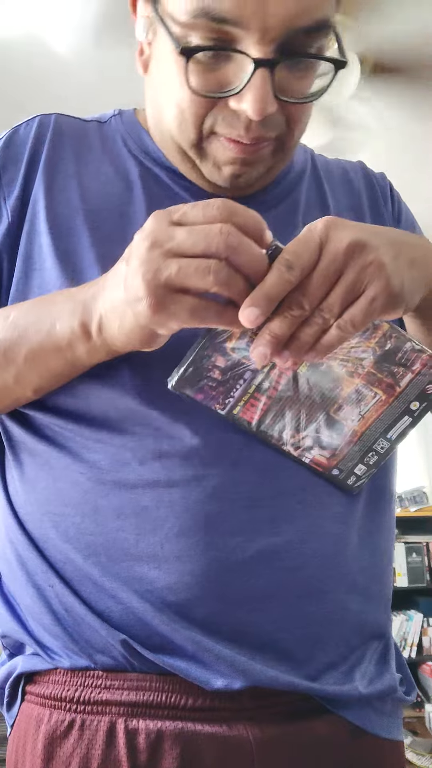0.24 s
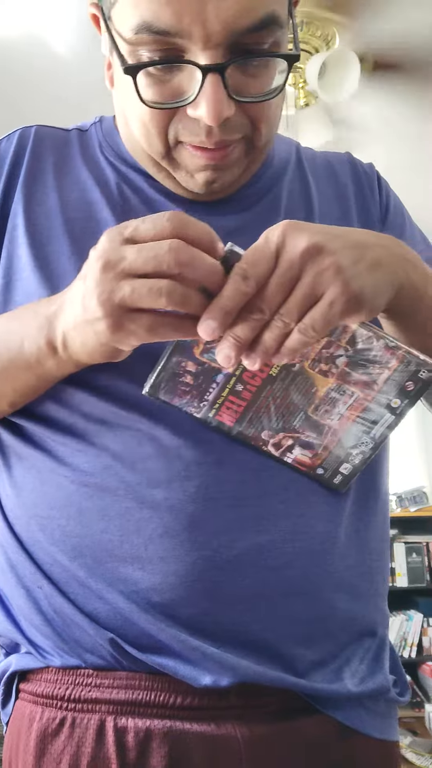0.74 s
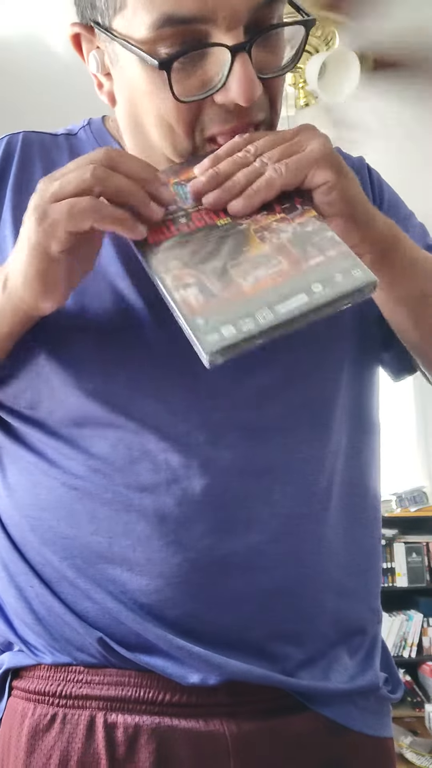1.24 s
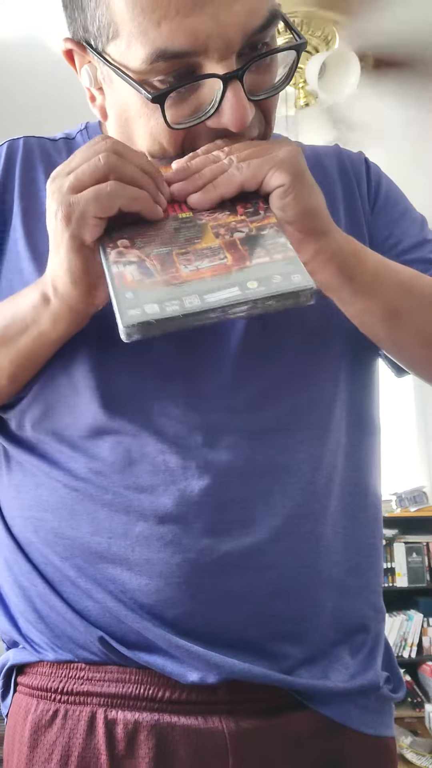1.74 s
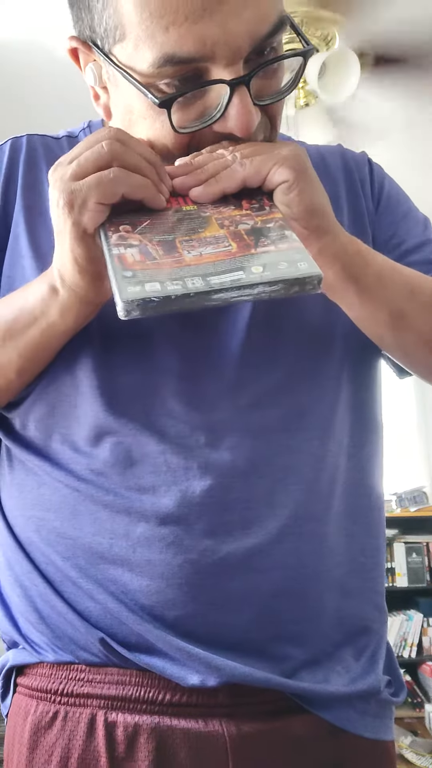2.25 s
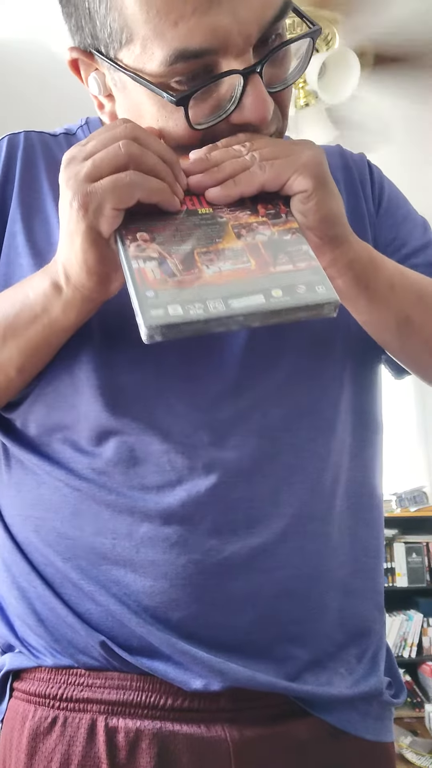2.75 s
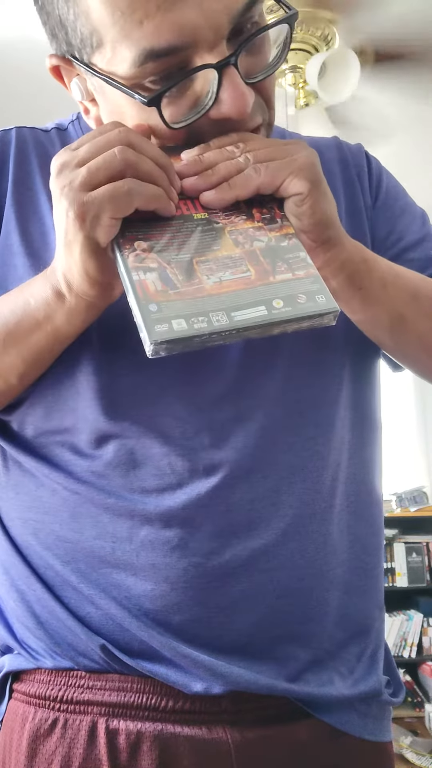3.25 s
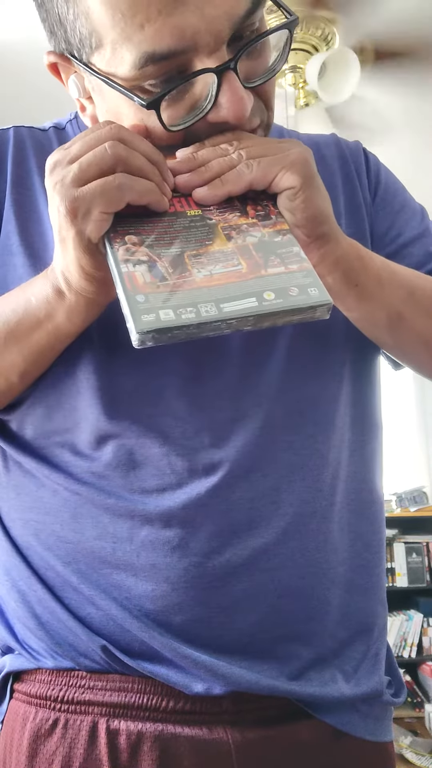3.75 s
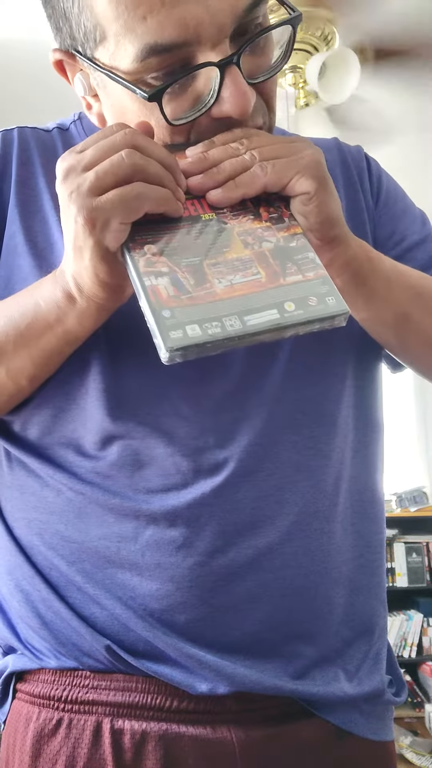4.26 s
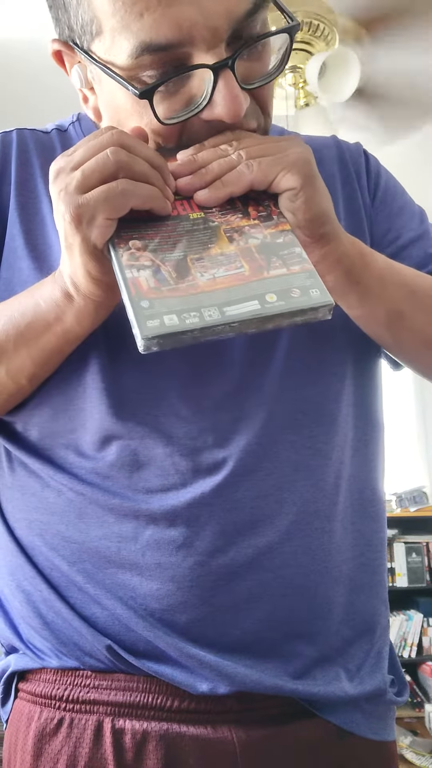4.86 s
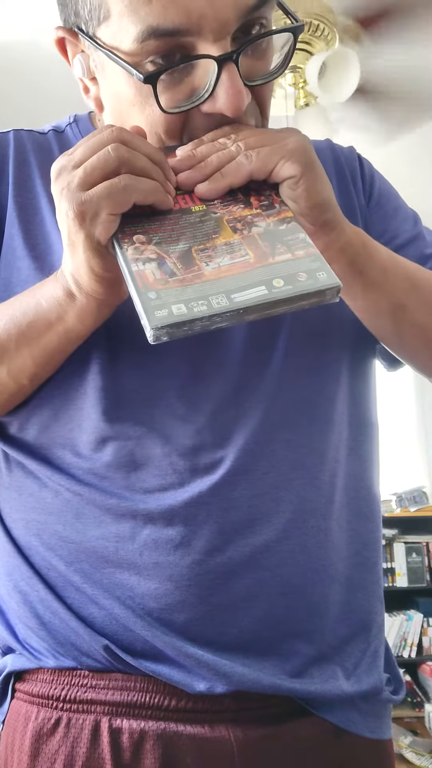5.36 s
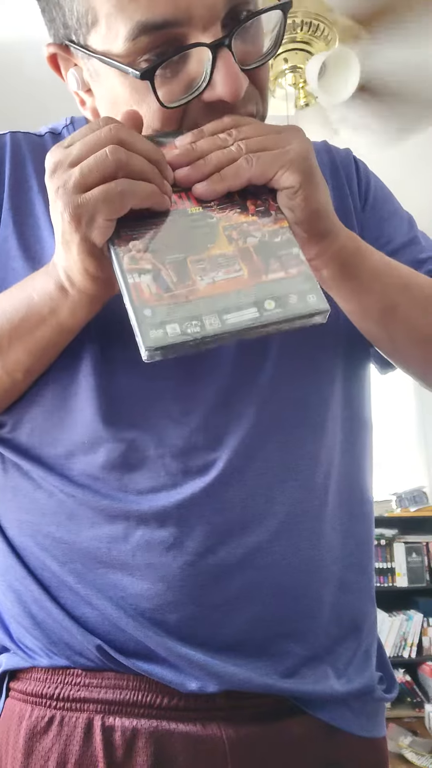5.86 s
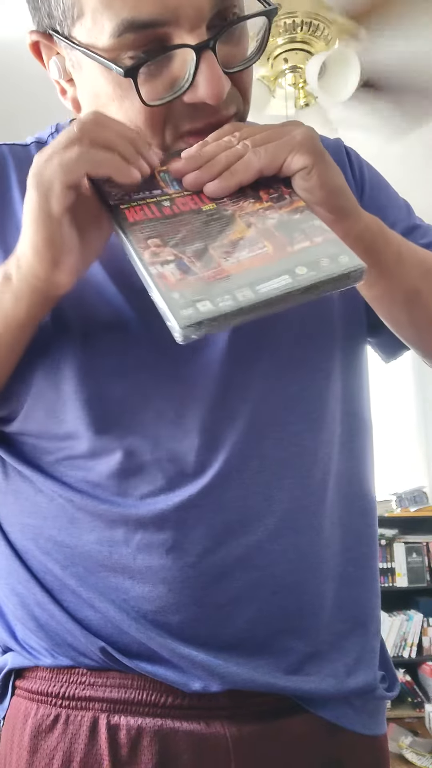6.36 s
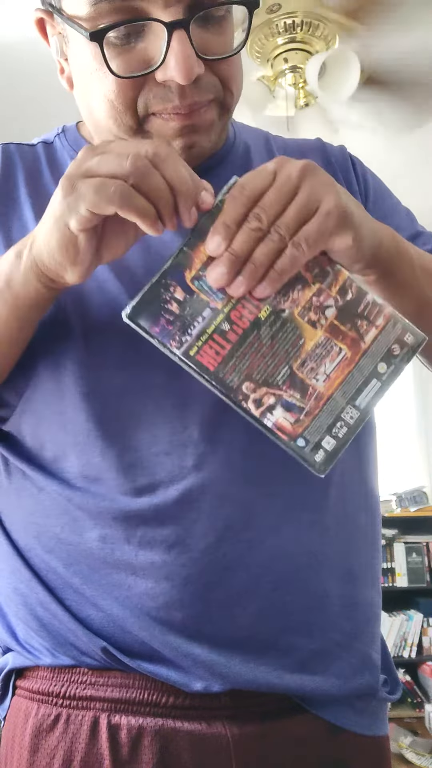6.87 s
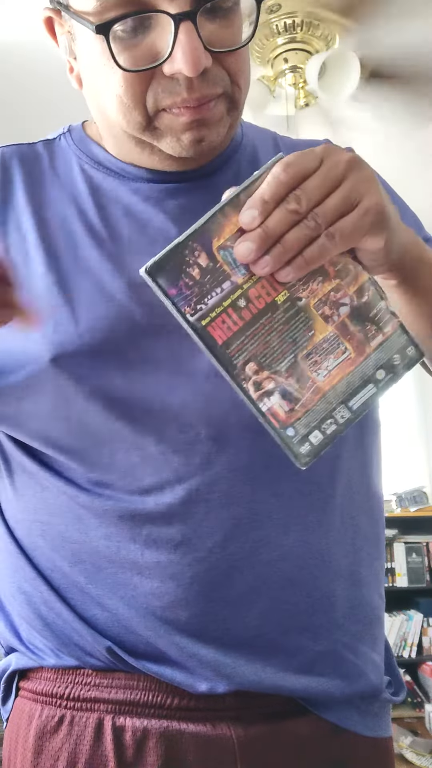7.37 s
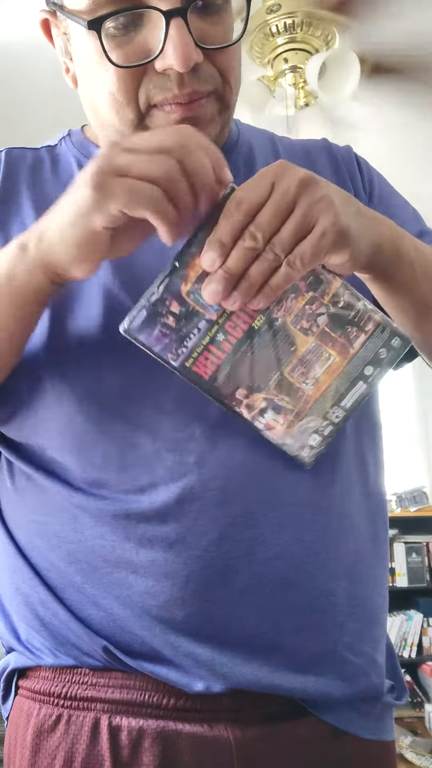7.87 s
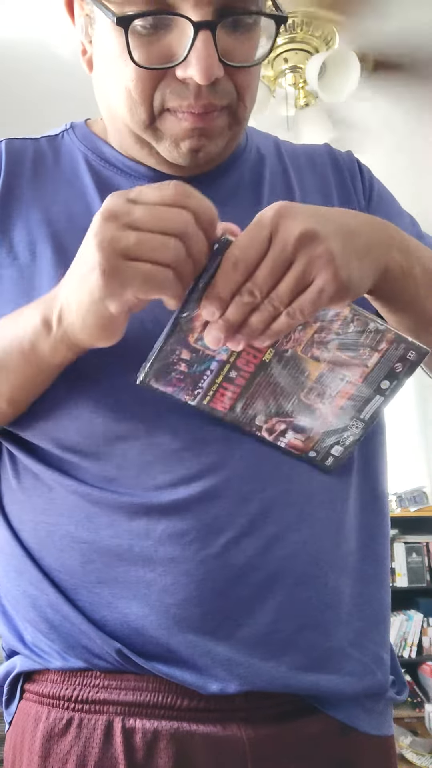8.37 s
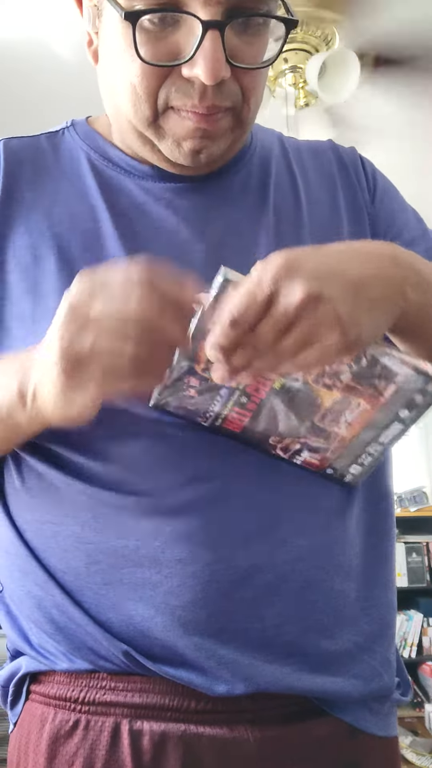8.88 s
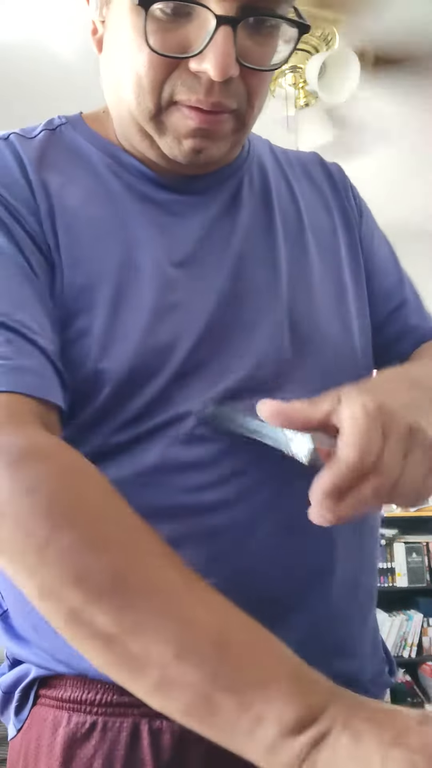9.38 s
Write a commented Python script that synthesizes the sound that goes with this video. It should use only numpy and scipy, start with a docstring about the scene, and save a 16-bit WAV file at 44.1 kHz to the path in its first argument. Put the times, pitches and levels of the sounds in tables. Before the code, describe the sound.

Thin plastic wrap snaps and crinkles on a hollow disc case over a steady fan rush, ending with loud knocks and scraping on a table.

```python
"""A fan rushes and hums throughout: shaped noise and two sines, in a small room with a phone at arm's length.
A fingernail ticks at a plastic disc case, then its shrink-wrap snaps: noisy bursts made to chirp downward.
From 1.3 to 6.65 s teeth hold the wrap, and clouds of tiny slips crinkle between the snaps and shell cracks.
Nail picking then leads, with soft rustling and hollow thuds. From 9.4 s a hand rummages loudly on the table
beside the phone: pitched knocks over scraping and hiss."""
import sys
import numpy as np
from scipy import signal
from scipy.fft import rfft, irfft
from scipy.io import wavfile

SR = 44100
rng = np.random.default_rng(int(sys.argv[2]) if len(sys.argv) > 2 else 0)


def dump(signal):
    """Clip the signal to [-1, 1] and save it as 16-bit WAV at the path in sys.argv[1]."""
    limited = np.clip(np.atleast_2d(signal).T, -1, 1)
    pcm = np.round(limited * 32767).astype(np.int16)
    wavfile.write(sys.argv[1], SR, pcm)


N = 425124
TIME = np.arange(N) / SR  # s

# relative spectrum of the fan's rush: (frequency [Hz], density [dB per Hz])
AIR_SPECTRUM = [(28, -27), (60, -15), (125, -8), (390, -5.5), (800, -13), (1650, -19), (1900, -12.5),
                (2200, -21.5), (7000, -23.5), (10000, -30.5)]
# the fan motor's hum: (frequency [Hz], RMS level at the left port [dB])
MOTOR_HUM = [(120.3, -74.5), (378, -77.5)]
# the right port faces away: (frequency [Hz], level against the left [dB])
RIGHT_PORT = [(120, 5.5), (650, -7.5), (1400, 0), (2600, 0.5), (4500, -8.5), (8000, -18), (15000, -9)]
# knocks on the table, before room and modes:
# (time [s], clack energy [dB], clack pitch [Hz], body energy [dB], body pitch [Hz])
TABLE_KNOCKS = [(9.407, 0, 4900, -2.5, 1030), (9.42, -18, 5000, -12, 557), (9.439, -27, 5000, -11, 690),
                (9.4732, -4, 6640, -15.5, 400), (9.4813, -4, 6500, -5, 1150), (9.504, -9, 6800, -26, 1100),
                (9.5175, 2.5, 5300, -13.5, 740), (9.527, -2.5, 5200, -23, 308),
                (9.568, -22, 5060, -8.5, 1140), (9.578, -17, 3000, -23, 1060), (9.586, -7, 2950, -18, 328)]
# things sliding over the table: (time [s], scrape level before colouring [dB], hiss level before its boost [dB])
TABLE_SLIDE = [(9.36, -69, -70.5), (9.402, -50.5, -66), (9.412, -36.5, -60), (9.45, -39, -24.5),
               (9.468, -40, -35), (9.512, -43.5, -41), (9.531, -31.5, -25), (9.586, -37.5, -37),
               (9.61, -55, -46)]
# colour of the scraping: (frequency [Hz], gain [dB])
SCRAPE_COLOUR = [(35, -1), (130, 25.5), (700, 3.5), (2200, -0.5), (6500, 5.5), (9500, -2.5)]
# modes of the things on the table: (frequency [Hz], relative level [dB], t60 [s])
TABLE_MODES = [(1170, 11, 0.063), (5180, 21, 0.027)]
# the loudest snaps of the wrap: (time [s], level before film colouring [dB], pitch [Hz])
FILM_SNAPS = [(0.4907, -29, 5080), (0.576, -46, 7240), (1.072, -44, 7150), (1.231, -46.5, 7200),
              (1.256, -48.5, 7200), (1.641, -45, 6600), (1.737, -40.5, 7300), (1.747, -39, 6950),
              (1.781, -46, 4260), (1.8142, -34.5, 6100), (1.851, -46, 6300), (1.882, -35.5, 5760),
              (2.0063, -40.5, 6900), (2.121, -36.5, 6800), (2.132, -35, 6300), (2.322, -43.5, 5400),
              (2.369, -39.5, 5260), (2.406, -43, 4500), (2.451, -36.5, 6900), (2.605, -36, 6300),
              (2.638, -38, 7960), (2.671, -50, 6200), (2.69, -42.5, 4680), (2.7983, -40, 7200),
              (2.973, -42, 6750), (3.1726, -35.5, 7100), (3.279, -41, 6800), (3.4403, -31.5, 7000),
              (3.5296, -34.5, 6560), (3.6277, -47.5, 3700), (3.7494, -33.5, 5650), (3.957, -40, 3900),
              (3.9789, -36, 6760), (4.021, -43, 4200), (4.233, -49.5, 6750), (4.432, -39, 7700),
              (4.607, -47, 6470), (4.7428, -45, 5270), (4.869, -50.5, 3640), (4.888, -41.5, 4500),
              (4.8954, -36.5, 5260), (5.033, -42, 8200), (5.052, -43, 5360), (5.081, -43, 6900),
              (5.216, -47, 4830), (5.227, -38, 6100), (5.422, -44.5, 7350), (5.459, -48, 6640),
              (5.661, -43, 5650), (5.7009, -37.5, 4870), (5.854, -44, 4460), (5.9685, -30, 6950),
              (5.993, -36, 6030), (6.029, -40.5, 3920), (6.059, -44, 3650), (6.141, -47, 4300),
              (6.272, -42.5, 4900), (6.4838, -36, 4800), (6.6019, -39.5, 5330), (6.779, -37, 8400),
              (6.8152, -46, 6750), (6.878, -33, 7100), (6.891, -34, 7040), (6.9706, -38, 7200),
              (6.989, -33, 7140), (7.0287, -35, 5000), (7.058, -39.5, 6640), (7.0788, -55, 5800),
              (7.098, -48.5, 3350), (8.079, -45.5, 9200), (8.439, -41, 6400), (8.554, -40, 5300),
              (8.8995, -36.5, 7650)]
# folds that move with every snap: (furthest lag, negative is early [s], energy against the snap [dB])
NEARBY_FOLDS = [(-.006, -17), (.008, -12), (.03, -17)]
# pulls on the film: (start [s], length [s], crinkle level before film colouring [dB])
FILM_PULLS = [(1.7, 0.19, -53.5), (2.06, 0.06, -56), (2.327, 0.15, -55.5), (2.545, 0.015, -60),
              (2.621, 0.08, -55.5), (3.35, 0.37, -58.5), (3.905, 0.095, -57), (4.72, 0.04, -58),
              (5.645, .29, -61), (5.985, 0.12, -54), (6.78, 0.37, -61.5)]
# hands sliding softly over the wrap: (start [s], length [s], rustle level before colouring [dB])
HAND_RUBS = [(1.0, 0.1, -61), (1.19, 0.072, -59), (8.0, 1.33, -64.5), (8.86, 0.055, -56)]
# how the film stretched over the case radiates: (frequency [Hz], gain [dB])
FILM_COLOUR = [(700, 30), (2000, 14), (3000, 10), (5200, -0.5), (7400, 3.5), (10500, -8), (14500, -1)]
# the case's shell gives with a crack: (time [s], level before case colouring [dB])
SHELL_CRACKS = [(0.489, -48), (1.489, -48.5), (1.677, -53.5), (1.881, -42.5), (2.028, -49.5),
                (2.1193, -40.5), (2.828, -52), (3.6281, -44), (3.9786, -47.5), (4.8958, -47.5),
                (6.4839, -46.5), (6.602, -46.5), (6.8143, -49.5), (6.988, -37.5), (7.0788, -41.5),
                (8.556, -43)]
# a fingernail picks at the edge of the case: (time [s], energy before room and modes [dB])
NAIL_PICKS = [(0.173, -33.5), (0.338, -34), (7.291, -33.5), (7.322, -32.5), (7.39, -29.5), (7.447, -24.5),
              (7.484, -26.5), (7.524, -22), (8.136, -33), (8.151, -31.5), (8.192, -38), (8.249, -28),
              (8.294, -27.5), (8.337, -26), (8.389, -24), (8.479, -23), (8.508, -29), (9.146, -29)]
# fingers slip and bump the hollow case: (time [s], thud energy before room and modes [dB], pitch [Hz])
CASE_BUMPS = [(0.489, -18, 710), (0.857, -28, 610), (0.867, -27, 850), (0.882, -31, 620), (1.491, -30, 620),
              (8.286, -30.5, 500), (8.555, -15, 730), (8.869, -24, 565), (8.886, -31.5, 640),
              (9.127, -29, 500)]
# the hollow case's broad body resonance: (frequency [Hz], gain [dB])
CASE_COLOUR = [(330, -7.5), (660, 6.5), (1000, -5.5), (1450, 2)]
# modes of the hollow case: (frequency [Hz], relative level [dB], t60 [s])
CASE_MODES = [(669.4, 1, 0.07), (1050, 4, 0.09), (1702, 10, 0.052), (5200, 1, 0.09)]

AIR_DB = -65  # RMS level of the rush at the left port
# the right port hears the direct sound this much earlier; longer waves reach both ports nearly alike
PORT_LEAD_S, BASS_ALIKE_HZ, BASS_SHARE = 0.00012, 470, 0.69
FILM_SNAP_S, CASE_TICK_S = 0.0015, 0.0045  # how long film and case hold their levels
# time constants of each pull or rub building up and letting go
STROKE_RISE_S, STROKE_FALL_S = 0.046, 0.0089
# the teeth hold the wrap between these times, keeping some crinkle up between pulls
BITE_START_S, BITE_END_S, TEETH_TENSION_DB = 1.3, 6.65, -65.5
REST_DB, STILL_DB = -83, -122  # crinkle outside pulls and bite; rustle while the hands lie still
# sizzle energy against the snap, lying open or covered by fingers or lips
SIZZLE_OPEN_DB, SIZZLE_COVERED_DB = -4.5, -11.5
PINCH_UNTIL_S = 0.79  # the corner is first pinched under the fingers
# the case's tick against a snap of this pitch: low snaps shake it more
CASE_UNDER_DB, CASE_DB_PER_OCTAVE, CASE_UNDER_HZ = -19, -11, 5940
# a bump of this pitch has as much scuff energy as thud; lower ones scuff less
SCUFF_EVEN_HZ, SCUFF_DB_PER_OCTAVE = 600, 4


def undb(db):
    """Turn dB into an amplitude factor."""
    return 10 ** (np.asarray(db) / 20)


def unit(x):
    """Scale to energy 1."""
    return x / np.sqrt(np.sum(x ** 2, axis=-1, keepdims=True))


def energy_db(db, held_s):
    """Energy of a burst that holds a level for a time."""
    return db + 10 * np.log10(held_s * SR)


def fade(t60, size=N):
    """Exponential decay that falls 60 dB in t60 seconds."""
    return np.exp(-np.log(1000) * np.arange(size) / SR / t60)


def colour(x, points, share=1):
    """Equalise along (frequency [Hz], gain [dB]) points, with share scaling the dB."""
    hz, db = np.transpose(points)
    f = np.fft.rfftfreq(N, 1 / SR)
    gain_db = share * np.interp(np.log(f + 1), np.log(hz), db)
    return irfft(rfft(x) * undb(gain_db), N)


def convolve(x, response):
    """Run two channels through an impulse response, trimmed to the scene's length."""
    return signal.fftconvolve(x, np.atleast_2d(response), axes=1)[:, :N]


def ring(x, modes):
    """Let x ring a body's modes, each a decaying sine."""
    response = sum(undb(db) * np.sin(2 * np.pi * hz * TIME) * fade(t60) for hz, db, t60 in modes)
    return convolve(x, unit(response))


def chirps(s, db, hz, octaves, ring_s, grit, octave_s=0.00062, scatter=1.0, size=2048):
    """Sudden buckles at times s, each in its own band and gliding down, as they reach the two ports."""
    count, lead = len(s), size // 8
    f = np.fft.rfftfreq(size, 1 / SR) + 1
    chance = rng.standard_normal((count, 3, size))
    # a push and a short rough ring; hands and chest scatter it differently to each port
    shared = grit * unit(chance[:, :1] * fade(ring_s, size))
    scattered = scatter * unit(chance[:, 1:] * fade(0.019, size))
    push = shared + scattered
    push[:, :, 0] += np.sign(chance[:, :1, -1])
    band = np.exp(-.5 * (np.log2(f / np.reshape(hz, (-1, 1, 1))) / octaves) ** 2)
    # bending waves are slower at low pitch, so a click glides down more the further it travels
    travel = .5 + rng.random((count, 1, 1))
    delay = lead + SR * octave_s * travel * np.log2(8000 / (f + 1500))  # samples
    glide = np.exp(-2j * np.pi * np.cumsum(delay, axis=-1) / size)
    waves = unit(irfft(rfft(push) * band * glide))
    out = np.zeros((2, N + 2 * size))
    starts = (np.clip(s, 0, N / SR) * SR).astype(int)
    for start, gain, wave in zip(starts, undb(db), waves):
        out[:, start:start + size] += gain * wave
    return out[:, lead:lead + N]


def crackle(effort, low_hz, high_hz, spread_db, octaves, rub_db, count):
    """Uneven small slips over a soft rubbing; a (time [s], level [dB]) curve makes slips louder and denser."""
    s, level_db = np.transpose(effort)
    level = undb(np.interp(TIME, s, level_db)) * (TIME >= s[0])
    when, pitch, strength = rng.random((count, 3)).T
    # slips crowd together where the effort is high
    progress = (np.arange(count) + 2 * when) / (count + 2)
    times = np.interp(progress, np.cumsum(level) / level.sum(), TIME)
    uneven = unit(undb(spread_db * strength ** 2))
    size = uneven * np.sqrt(level.sum() * undb(np.interp(times, s, level_db)))
    hz = high_hz * (low_hz / high_hz) ** pitch ** 2  # favours the high end
    slips = chirps(times, 20 * np.log10(size), hz, octaves, ring_s=0.004, grit=0.4, octave_s=.0011, scatter=.55)
    band = signal.butter(1, [low_hz, high_hz], "band", fs=SR, output="sos")
    noise = rng.standard_normal((2, N)) + rng.standard_normal(N)  # partly alike at both ports
    rub = np.sqrt(N) * unit(signal.sosfilt(band, noise))
    return slips + rub * undb(rub_db) * level


def place(x, room_db, room_s, shade):
    """The right port hears direct sound earlier and recoloured, bass nearly alike, in a diffuse room tail."""
    tail = rng.standard_normal((2, N)) * fade(room_s) * (TIME > .003)
    wet = undb(room_db) * convolve(x, unit(tail))
    left = np.interp(TIME - PORT_LEAD_S, TIME, x[0]) + wet[0]
    right = colour(x[1], RIGHT_PORT) + colour(wet[1], RIGHT_PORT, shade)
    bass = signal.butter(2, BASS_ALIKE_HZ, fs=SR, output="sos")
    return np.array([left, right + BASS_SHARE * signal.sosfiltfilt(bass, left - right)])


def fan():
    """Steady moving air as shaped noise, alike at both ports in the bass, and the motor's hum as sines."""
    common, *own = rng.standard_normal((3, N))
    f = np.fft.rfftfreq(N, 1 / SR)
    alike = 1 / (1 + (f / 650) ** 4)  # shared part of the power
    noise = irfft(rfft(common) * np.sqrt(alike) + rfft(own) * np.sqrt(1 - alike), N)
    rush = undb(AIR_DB) * np.sqrt(N) * unit(colour(noise, AIR_SPECTRUM))
    hum = sum(undb(db) * np.sqrt(2) * np.sin(2 * np.pi * hz * TIME) for hz, db in MOTOR_HUM)
    air = rush + hum
    return np.array([air[0], colour(air[1], RIGHT_PORT, 0.44)])


def knocking():
    """Hard things collide with a bright clack, a lower body tone and a treble sizzle."""
    s, db, hz, body_db, body_hz = np.transpose(TABLE_KNOCKS)
    clacks = chirps(s, db, hz, octaves=0.3, ring_s=0.016, grit=0.69)
    body = chirps(s, body_db, body_hz, octaves=0.27, ring_s=0.033, grit=0.16, size=4096)
    sizzle = chirps(s, db - 11.5, 11700, octaves=0.3, ring_s=0.016, grit=1.0)
    return clacks + body + sizzle


def sliding():
    """Things drag over the table in a cloud of scraping slips and treble hiss."""
    s, scrape_db, hiss_db = np.transpose(TABLE_SLIDE)
    effort = np.column_stack([s, scrape_db])
    scrape = crackle(effort, low_hz=746, high_hz=7500, spread_db=11, octaves=0.69, rub_db=-1, count=300)
    hiss_s = s[0] + np.ptp(s) * rng.random(300)
    hiss = chirps(hiss_s, np.zeros(300), 13800, octaves=0.35, ring_s=.01, grit=1.0)
    return colour(scrape, SCRAPE_COLOUR) + hiss * undb(11 + np.interp(TIME, s, hiss_db))


def rummage():
    """Things knock and slide on the table close to the phone, ringing their modes."""
    things = knocking() + sliding()
    return place(things + undb(-18.5) * ring(things, TABLE_MODES), room_db=-10.5, room_s=0.18, shade=0.66)


def bitten(s):
    """True while the wrap is between the teeth."""
    return (s > BITE_START_S) & (s < BITE_END_S)


def sizzle_db(s):
    """Sizzle energy against the snap [dB]: fingers or lips over the film damp it."""
    return np.where(bitten(s) | (s < PINCH_UNTIL_S), SIZZLE_COVERED_DB, SIZZLE_OPEN_DB)


def work(strokes, rest_db):
    """Hand effort as (time [s], level [dB]): strokes build up, hold and let go over a resting level."""
    s = TIME[::200]
    power = np.interp(s, TIME, undb(rest_db) ** 2 * np.ones(N))
    for start, length, db in strokes:
        before, after = np.maximum(start - s, 0), np.maximum(s - start - length, 0)
        stroke = undb(db) * np.exp(-before / STROKE_RISE_S - after / STROKE_FALL_S)
        power = power + stroke ** 2
    return np.column_stack([s, 10 * np.log10(power)])


def picking():
    """The nail slips off the edge with a crisp, broad tick."""
    s, db = np.transpose(NAIL_PICKS)
    return chirps(s, db, 2900, octaves=1.05, ring_s=.007, grit=.7, scatter=.5)


def bumping():
    """Each bump thuds in the hollow case and scuffs the wrap."""
    s, db, hz = np.transpose(CASE_BUMPS)
    thuds = chirps(s, db, hz, octaves=0.85, ring_s=0.045, grit=3, size=4096)
    scuff_db = db + SCUFF_DB_PER_OCTAVE * np.log2(hz / SCUFF_EVEN_HZ)
    scuffs = chirps(s, scuff_db, 3300, octaves=0.81, ring_s=0.041, grit=4.4, size=4096)
    return thuds + scuffs


def hollow_case():
    """The shell ticks under every snap, cracks as it gives, rustles under fingertips and takes picks and bumps."""
    s, film_db, hz = np.transpose(FILM_SNAPS)
    crack_s, crack_db = np.transpose(SHELL_CRACKS)
    tick_db = film_db + CASE_UNDER_DB + CASE_DB_PER_OCTAVE * np.log2(hz / CASE_UNDER_HZ)
    all_s = np.append(s, crack_s)
    all_db = energy_db(np.append(tick_db, crack_db), CASE_TICK_S)
    ticks = chirps(all_s, all_db, 1680, octaves=1.83, ring_s=0.028, grit=0.71)
    effort = work(HAND_RUBS, STILL_DB)
    fingers = crackle(effort, low_hz=700, high_hz=1800, spread_db=10, octaves=0.7, rub_db=2, count=250)
    return colour(ticks + undb(-14.5) * fingers, CASE_COLOUR) + picking() + bumping()


def snapping():
    """Taut film buckles in falling chirps, with nearby folds moving just before or after."""
    s, film_db, hz = np.transpose(FILM_SNAPS)
    db = energy_db(film_db, FILM_SNAP_S)
    snaps = chirps(s, db, hz, octaves=0.4, ring_s=.004, grit=0.8, octave_s=.0011, scatter=.8)
    for lag_s, fold_db in NEARBY_FOLDS:
        fold_s = s + lag_s * rng.random(len(s))
        snaps = snaps + chirps(fold_s, db + fold_db, hz, octaves=0.72, ring_s=0.0076, grit=0.32)
    return snaps


def sizzling():
    """Every snap throws off a treble burst, softer where the film is covered."""
    s, film_db, _ = np.transpose(FILM_SNAPS)
    db = energy_db(film_db, FILM_SNAP_S) + sizzle_db(s)
    return chirps(s, db, 13500, octaves=0.3, ring_s=0.0037, grit=1.0)


def crinkling():
    """Pulls and the teeth's grip make the film slip in many tiny crinkles."""
    grip = work(FILM_PULLS, np.where(bitten(TIME), TEETH_TENSION_DB, REST_DB))
    return crackle(grip, low_hz=3500, high_hz=7400, spread_db=24, octaves=0.4, rub_db=-18, count=1000)


def rustling():
    """Hands sliding over the wrap make a soft, bright rustle of slips."""
    effort = work(HAND_RUBS, STILL_DB)
    return crackle(effort, low_hz=3640, high_hz=13500, spread_db=21, octaves=0.58, rub_db=-10.5, count=900)


def wrap():
    """Film and hollow case sound together; the case also rings its modes."""
    film = colour(snapping() + crinkling() + rustling(), FILM_COLOUR) + sizzling()
    case = hollow_case()
    return place(film + case + undb(-17) * ring(case, CASE_MODES), room_db=-9, room_s=0.26, shade=0.65)


def scene():
    """Mix the fan, the rummaging and the wrap."""
    return fan() + rummage() + wrap()


def record(dry):
    """The phone cuts steeply above 16 kHz."""
    return signal.sosfilt(signal.ellip(10, .2, 70, 16000, fs=SR, output="sos"), dry)


dry = scene()
out = record(dry)
dump(out)
```